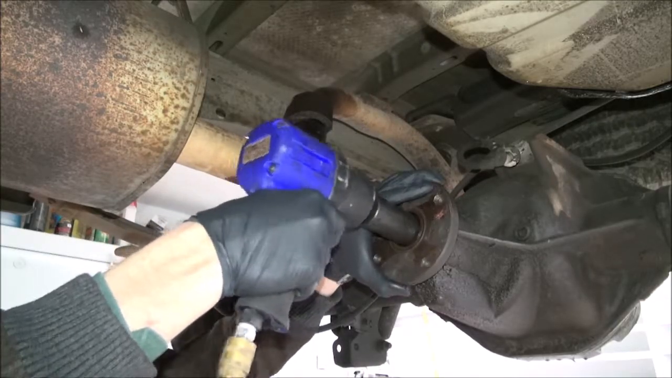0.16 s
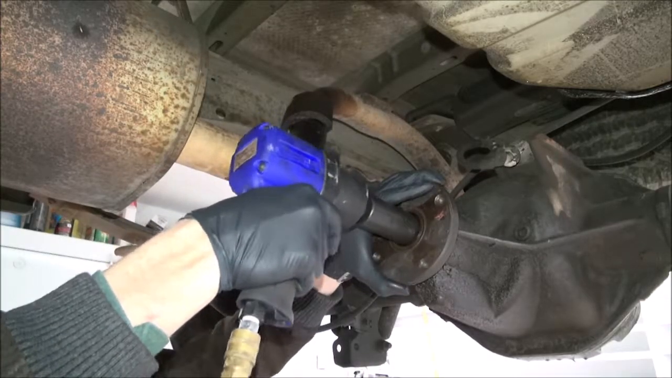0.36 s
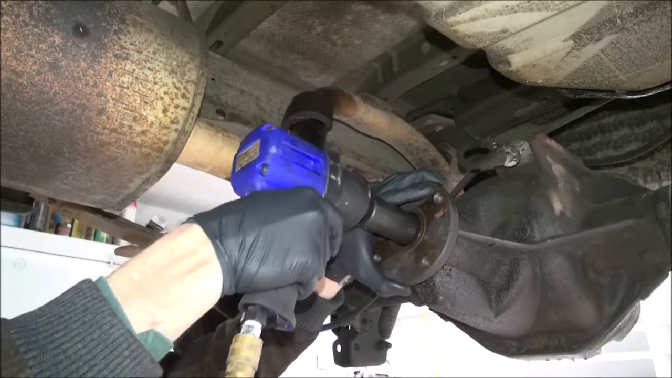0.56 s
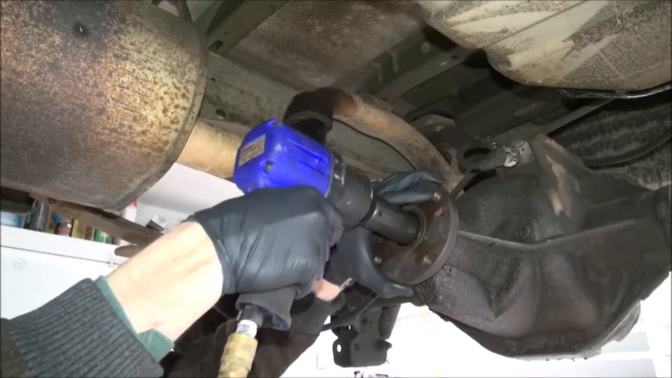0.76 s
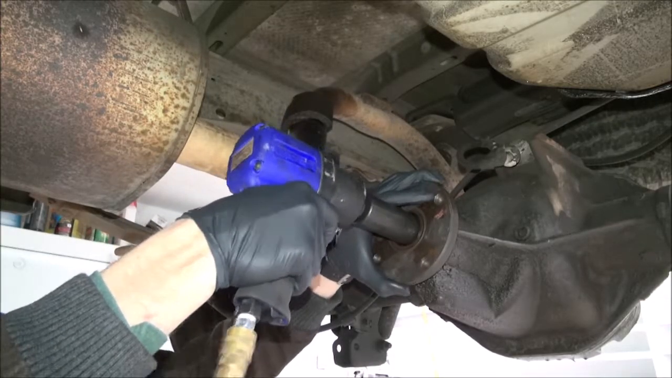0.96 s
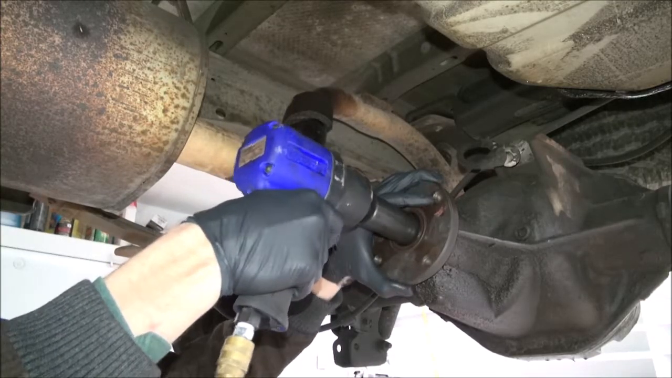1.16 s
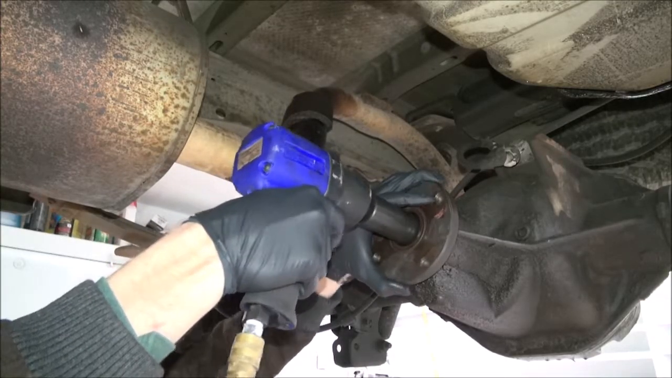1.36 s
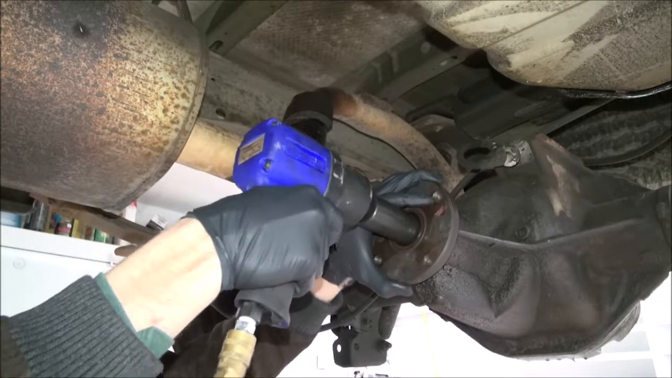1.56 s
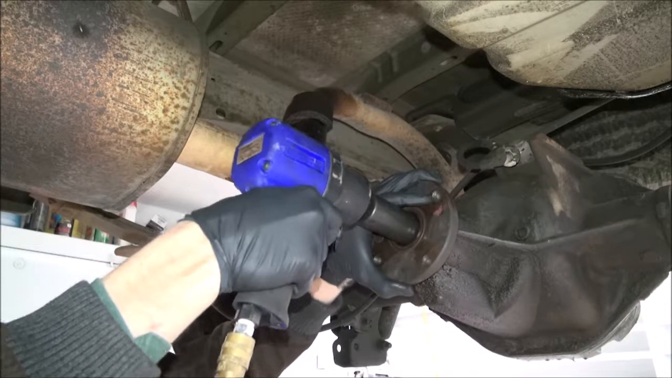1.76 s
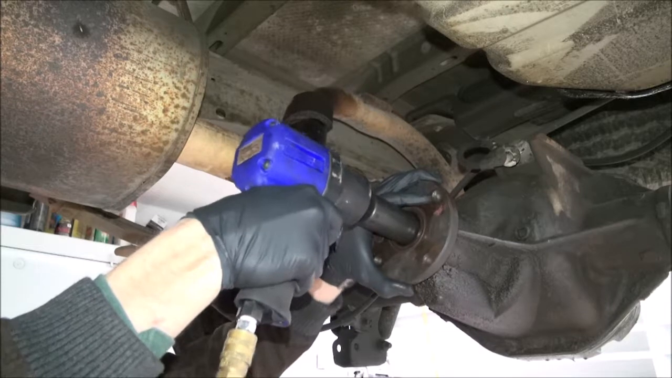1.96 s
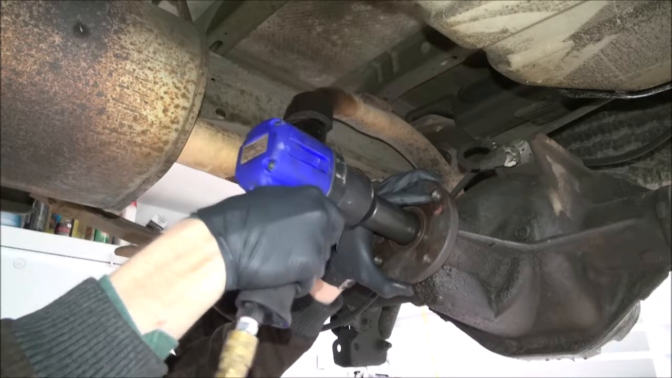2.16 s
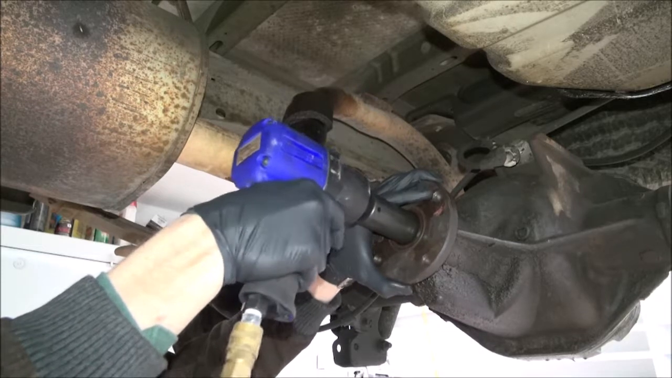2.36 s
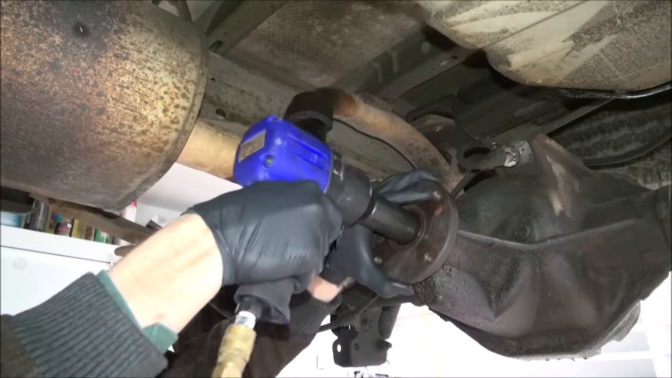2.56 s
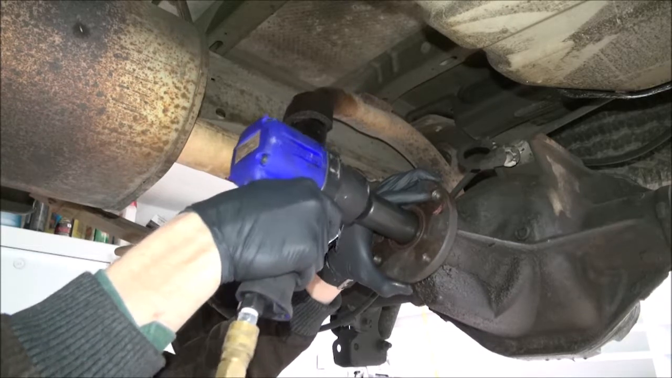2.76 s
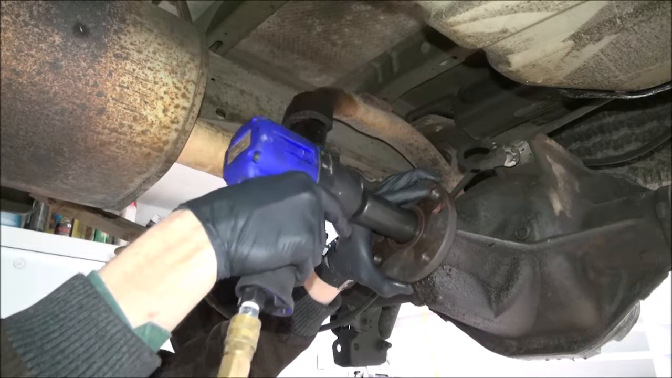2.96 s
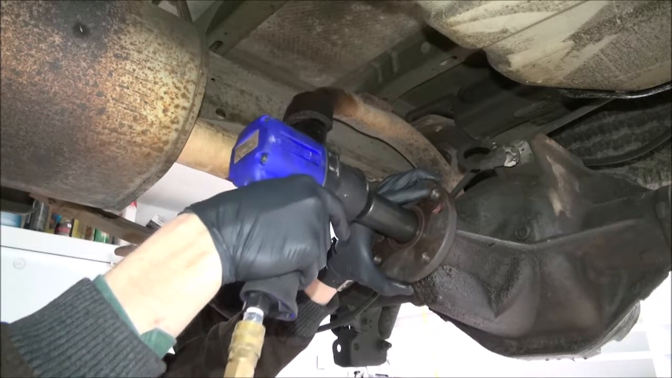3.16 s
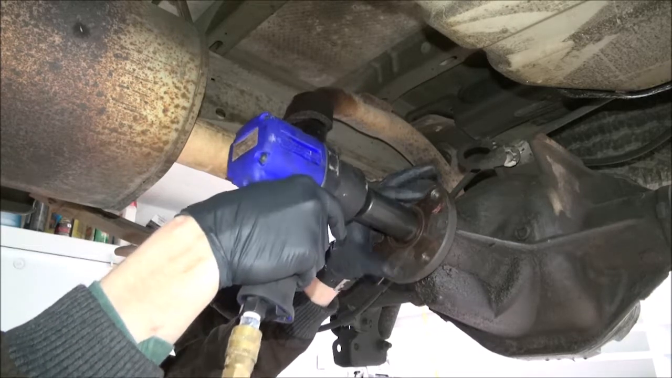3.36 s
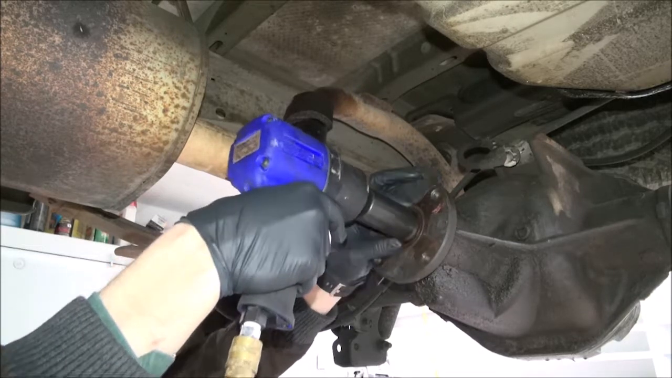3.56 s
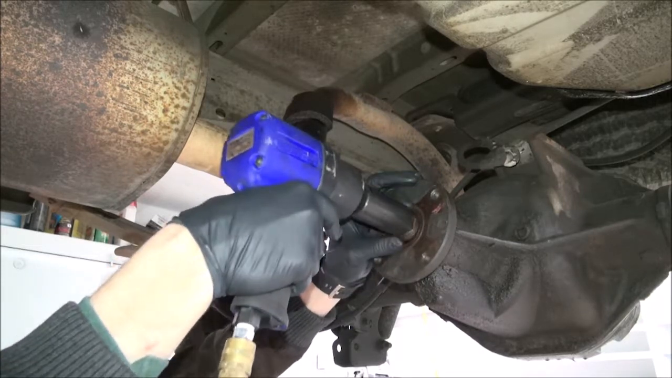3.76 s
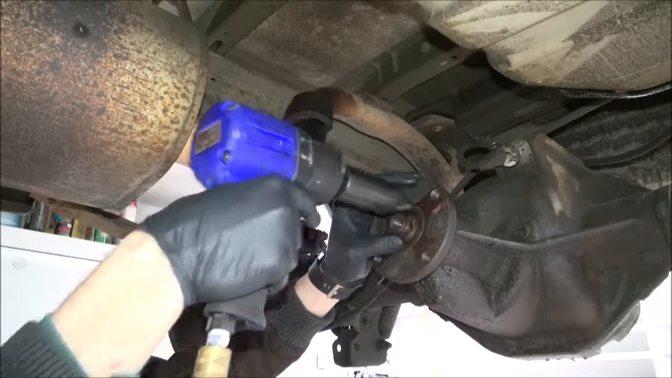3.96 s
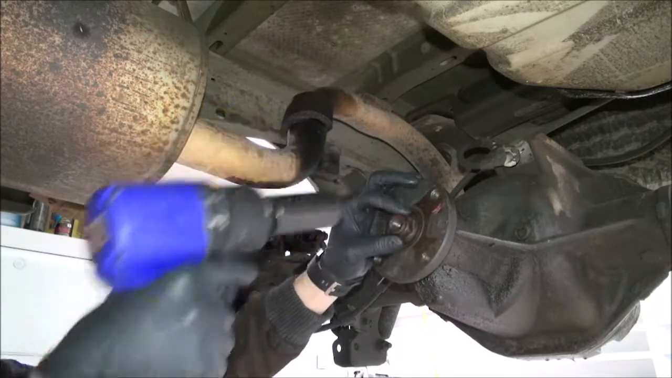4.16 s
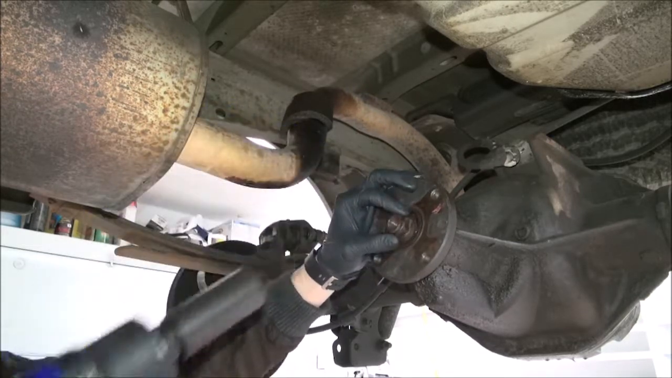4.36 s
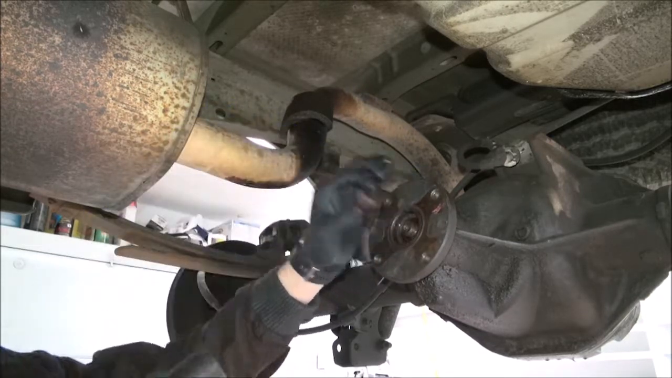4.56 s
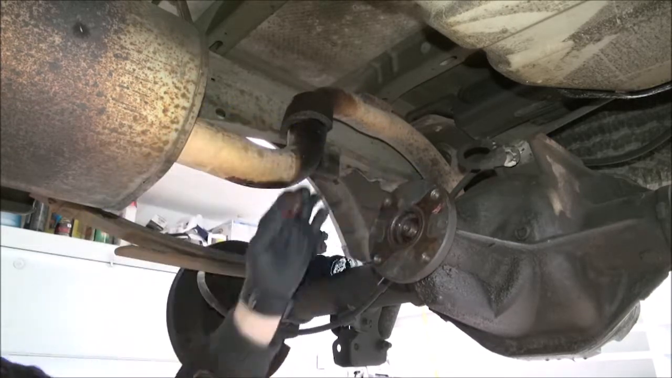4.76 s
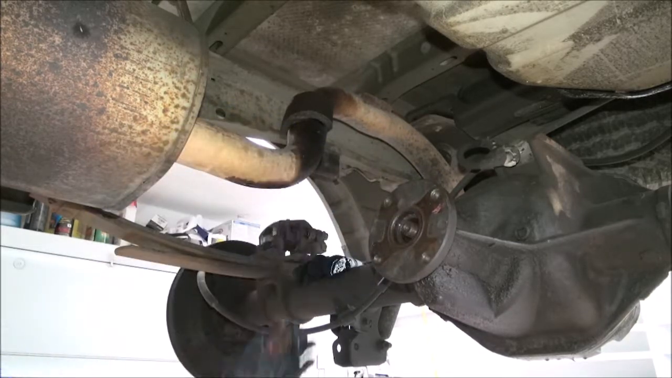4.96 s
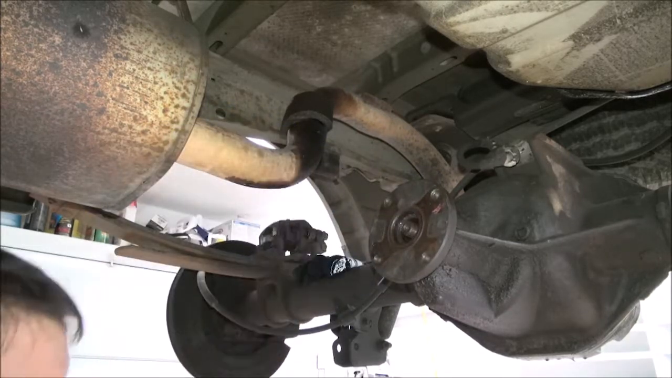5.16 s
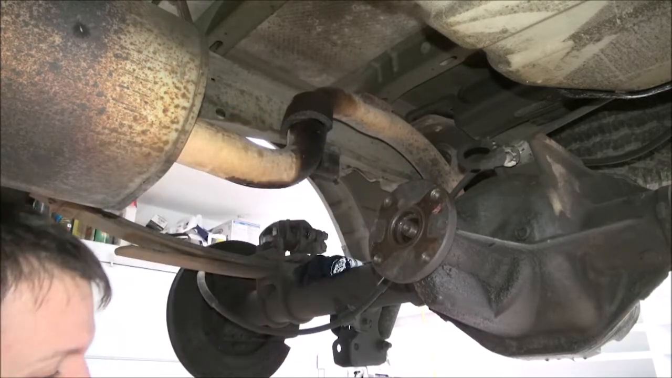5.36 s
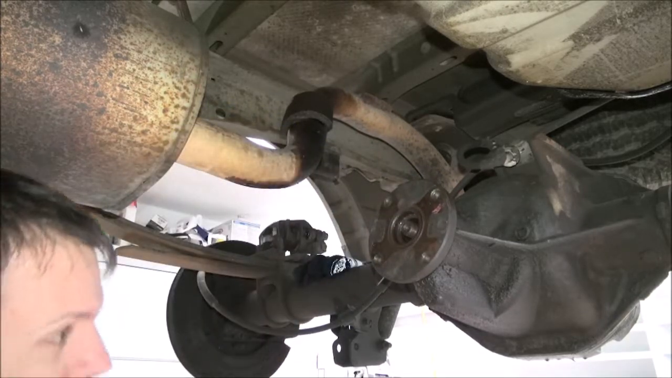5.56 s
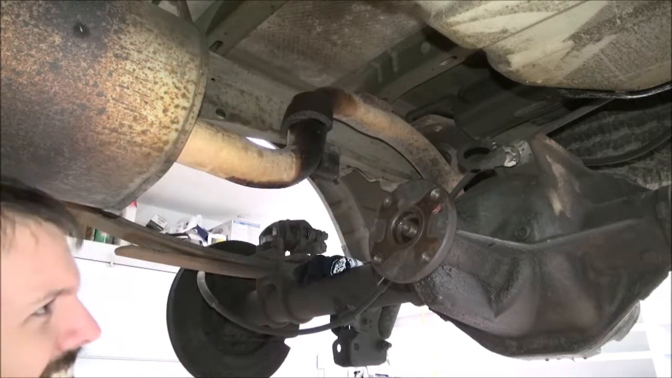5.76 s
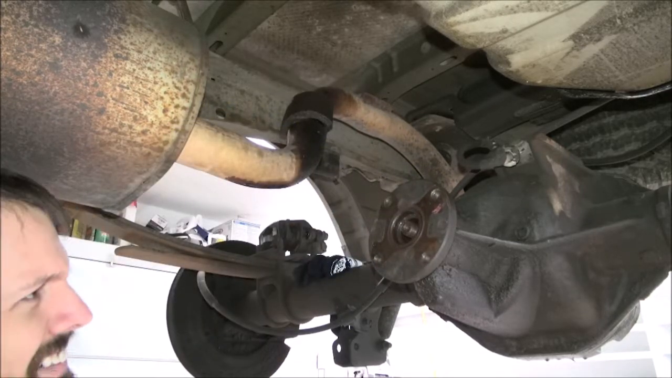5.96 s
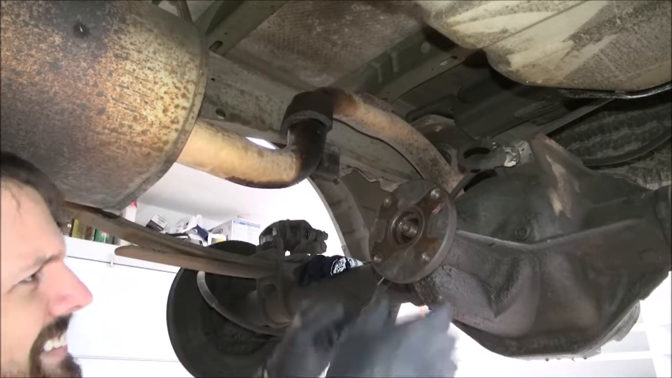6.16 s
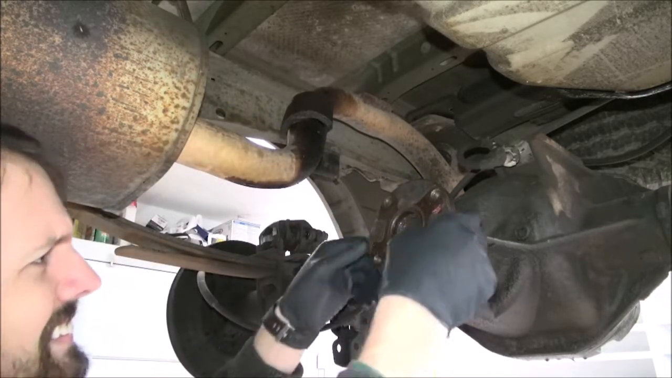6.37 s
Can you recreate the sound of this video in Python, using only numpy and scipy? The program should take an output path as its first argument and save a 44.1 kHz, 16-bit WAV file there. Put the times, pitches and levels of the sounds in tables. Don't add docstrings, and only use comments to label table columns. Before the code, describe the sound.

Very close and loud under a car in a garage, an air impact wrench is already sounding at the start. Short bursts of sharp, clattering steel blows come at about 0.1, 0.4 and 0.7 s, a longer one from 1.0 to 1.27, then sustained hammering at roughly 26 blows a second from 1.4 to 2.3. Each pull begins with a gulp of air; chugging, rattling and hiss fade quickly on release, and the exhaust pipe hums faintly. At 2.5 s the nut frees: uneven blows, then a whine climbing until 2.86 and sliding down, with loose knocks, stopping near 3.4. Quiet ticks, soft rubs and a faint low hum continue until about 5.1. At 5.17 the background abruptly becomes slightly louder. A thud at 5.6 precedes a bouncing, ringing steel clank around 5.75, followed by small settling bumps and ticks to the end.

```python
import sys
import numpy as np
from scipy import signal
from scipy.fft import rfft, irfft, next_fast_len
from scipy.io import wavfile

SR = 44100
rng = np.random.default_rng(int(sys.argv[2]) if len(sys.argv) > 2 else 0)


def rack_gain(trim_db):
    fader = np.asarray(trim_db, float)
    return 10 ** (fader / 20)


def transcribe(signal):
    frames = np.atleast_2d(signal).T
    limited = np.clip(frames, -1, 1)
    pcm = np.round(limited * 32767).astype(np.int16)
    wavfile.write(sys.argv[1], SR, pcm)


N = 283122
BUSY = int(3.7 * SR)


def unit(x):
    return x / np.sqrt(np.mean(x ** 2) + 1e-20)


def along(points, hz):
    f, v = np.transpose(points)
    return np.interp(np.log(hz + 1), np.log(f + 1), v)


def curves(rows, size=BUSY):
    s, *columns = np.transpose(rows)
    return [np.interp(np.arange(size) / SR, s, column) for column in columns]


def wobble(rate, size=BUSY):
    knots = rng.standard_normal(int(size * rate // SR) + 2)
    return np.interp(np.arange(size) * rate / SR, np.arange(len(knots)), knots)


def filtered(x, response):
    m = next_fast_len(x.shape[-1] + 8192)
    return irfft(rfft(x, m) * response(np.fft.rfftfreq(m, 1 / SR)), m)[..., :x.shape[-1]]


def modes(table):
    def response(f):
        total = 0
        for k, (c, w, db) in enumerate(table):
            total = total + (-1) ** k * rack_gain(db) * 1j * f * w / (c * c - f * f + 1j * f * w)
        return total
    return response


def band(x, hz, width):
    return filtered(x, lambda f: modes([(hz, width, 0)])(f) ** 2)


def coloured(spectrum, size=N):
    return unit(filtered(rng.standard_normal(size), lambda hz: rack_gain(along(spectrum, hz))))


def add(track, s, sound):
    part = track[round(s * SR):][:len(sound)]
    part += sound[:len(part)]


# (pressed [s], let go [s], air strength [dB], first gulp [dB])
PULLS = [
    (-.1, 0.019, 1.5, 0),
    (0.102, 0.296, 2.5, 17.5),
    (0.427, 0.588, 2, 12.5),
    (.717, 0.875, 3, 11),
    (.966, 1.266, 2, 4),
    (1.399, 2.275, 1, 7),
    (2.523, 2.624, -1.5, 6.5),
]


def airflow(bleed, gulps=False):
    fill_s, shut_db = 0.045, -11
    surge_at_s, surge_s = 0.02, 0.012
    sag_db_per_s = 3
    t, out = np.arange(BUSY) / SR, np.full(BUSY, -120.)
    for s, off, db, gulp_db in PULLS:
        level = db + shut_db * np.clip(1 - (t - s) / fill_s, 0, 1)
        level = level + gulps * gulp_db * np.exp(-((t - s - surge_at_s) / surge_s) ** 2)
        level = level - sag_db_per_s * (np.clip(t, s, off) - s)
        level = level - bleed * np.clip(t - off, 0, None) * (s < PULLS[-1][0])
        out = np.maximum(out, np.where(t >= s, level, -120))
    return out


# (first blow [s], gap [s], blows [count])
STEADY_RUNS = [
    (1.1077, .0367, 4),
    (1.5654, .0384, 16),
    (2.1859, .0396, 3),
]
# (time [s], peak level [dB])
STRAY_BLOWS = [(0.0136, -5), (0.1404, 0.5), (0.1826, -1), (0.2657, -5), (0.2852, -8), (0.4719, -0.5),
               (0.5572, -6.5), (0.582, -10.5), (0.7494, -10.5), (0.7634, -4.5), (0.7826, -5),
               (0.8421, -4.5), (1.0092, -4), (1.031, -3), (1.0656, -1), (1.0907, -2.5), (1.1293, -4.5),
               (1.161, -5), (1.2604, -3), (1.4357, -3), (1.483, -3), (1.5047, 0.5), (1.528, 0),
               (1.8945, -6), (2.048, -7), (2.3518, -6.5)]
# (time [s], peak level [dB])
FREEING_BLOWS = [
    (2.5568, -7),
    (2.576, 1),
    (2.6389, -8),
    (2.6548, -5),
    (2.6729, -9.5),
    (2.687, -4),
    (2.7297, -8),
    (2.7554, -2),
    (2.808, -7),
]
# (time [s], peak level [dB])
LOOSE_KNOCKS = [
    (2.941, -10.5),
    (3.0671, -32.5),
    (3.1242, -26),
    (3.1719, -21),
]


def blows():
    thump_db, rows = -21, []
    for s, off, db, gulp_db in PULLS[1:]:
        rows.append((s, -20 + db, -11.5))
        rows.append((s + 0.0155, -7.5 + db, -14.5))
    for s, gap, count in STEADY_RUNS:
        rows += [(s + k * gap, -2 + 1.5 * rng.normal(), thump_db) for k in range(count)]
    rows += [(s, db, thump_db) for s, db in [*STRAY_BLOWS, *FREEING_BLOWS]]
    rows += [(s, db, -7.5) for s, db in LOOSE_KNOCKS]
    return sorted(rows)


# (frequency [Hz], width [Hz], level [dB])
STEEL = [(1640, 260, -5), (2422, 30, -3.5), (3660, 190, 5.5), (4160, 34, -16), (5430, 220, -22.5),
         (6230, 20, -2.5), (10300, 95, -13), (11600, 62, -22.5), (11800, 69, -18)]
# (frequency [Hz], level [dB per Hz])
CLATTER = [(180, -32.5), (300, -4), (2090, -3.5), (2590, -1.5), (3270, -6.5), (3610, -7.5), (4060, -7.5),
           (6460, -5.5), (8010, -17.5), (11700, -16.5), (15800, -23.5)]


def struck(x, body_db, ring_db):
    return filtered(x, lambda hz: rack_gain(body_db + along(CLATTER, hz)) + rack_gain(ring_db) * modes(STEEL)(hz))


# (frequency [Hz], width [Hz], level [dB])
MUFFLER = [(110, 43, -4.5), (241.4, 40, 2), (510, 150, -4), (626, 57, -3.5)]
BRIGHT_SPOTS = [1300, 1620, 2400, 2620, 2620, 2790, 3740, 3650, 5800]


def hammer(hits):
    out, thump, t = np.zeros(BUSY), np.zeros(BUSY), np.arange(SR // 12) / SR
    shape = (rack_gain(-60 * t / 0.022) + rack_gain(-6.5 - 60 * t / 0.12)) * (1 - np.exp(-t / 0.000096))
    for s, db, thump_db in [(0.00039, -1.6, -5.0)] + hits:
        bright_hz = rng.choice(BRIGHT_SPOTS) if s > PULLS[1][0] else 3100
        burst = shape * rng.standard_normal(len(t))
        spot = filtered(burst, modes([(bright_hz, 0.25 * bright_hz, 0)]))
        add(out, s, rack_gain(db) * (rack_gain(-2.5) * burst + rack_gain(-1.0) * spot))
        add(thump, s, rack_gain(db + thump_db + 11.0) * burst)
    out = filtered(out, lambda hz: 1 / (1 + 1j * hz / 12000))
    return struck(out, body_db=0.0, ring_db=-10) + filtered(thump, modes(MUFFLER))


# (time [s], vane rate [Hz], whine [dB], shaking under full air [dB])
VANES = [
    (2.56, 184.7, -43.5, -0.5),
    (2.62, 247.5, -34.5, 1.5),
    (2.8, 478.2, -33.5, -6),
    (2.858, 504, -30, -2.5),
    (2.894, 441.8, -27, -12),
    (2.998, 246.1, -26, -17),
    (3.102, 138.7, -41, -19.5),
    (3.23, 99.6, -45.5, -32),
    (3.52, 29.64, -100, -40.5),
]
# (frequency [Hz], level [dB])
WHINE = [(100, -11.5), (160, -3.5), (230, -0.5), (400, -4), (520, -7.5), (700, -8), (1000, 3), (1250, 0.5),
         (1500, -5.5), (2300, -2), (3500, -38)]
OVERTONES = [-1.5, -6, -4.5, -12.5, -8.5, -15]
# (frequency [Hz], level [dB per Hz])
HISS = [(2940, -30.5), (5000, -10.5), (6450, -8), (8090, -12.5), (12000, -1.5), (15800, -22.5)]
# (frequency [Hz], width [Hz], level [dB])
BEARINGS = [(1070, 210, 0), (2200, 320, 0), (2790, 15, -17), (3540, 67, -10), (5400, 58, -21),
            (5900, 52, -15.5)]
BLEED = {"rattle": 201.5, "chug": 124, "hiss": 262}


def wrench(hits):
    t, starts = np.arange(BUSY) / SR, np.transpose(hits)[0]
    since = t - starts[np.maximum(np.searchsorted(starts, t) - 1, 0)]
    vane_hz, whine_db, shake_db = curves(VANES)
    shake_db = shake_db - 240 * np.clip(t - 3.52, 0, None)
    rattle_db = -16 + airflow(BLEED["rattle"]) + shake_db - 76.5 * np.clip(since, 0, .04)
    hiss_db = -34 + airflow(BLEED["hiss"]) + 1.2 * shake_db
    emptying_db = 250 * np.clip(t - 3.33, 0, None)
    chug_db = -27 + airflow(BLEED["chug"], gulps=True) + .4 * shake_db - emptying_db
    free = t > VANES[0][0]
    shut = np.clip((t - 2.95) / 0.17, 0, 1)

    rotor_hz = np.where(free, vane_hz, np.clip(90 + 7000 * since, 60, 300))
    turn = np.cumsum(rotor_hz * (1 + .009 * wobble(60))) / SR
    puffs = np.diff(np.floor(turn), prepend=0) * rack_gain(3 * wobble(200))
    gate = 1 + .5 * np.cos(2 * np.pi * turn)
    breath = .5 * unit(puffs) * ~free + gate * rng.standard_normal(BUSY)
    chug = (1 - shut) * unit(filtered(breath, modes(MUFFLER))) + shut * unit(band(breath, hz=216, width=22))
    chug = unit(chug * rack_gain(1.6 * wobble(30)))

    over_db = 2 - 7 * np.clip((t - 2.88) / .1, 0, 1)
    whine = np.zeros(BUSY)
    for k, db in enumerate(OVERTONES, 1):
        tone_db = db + (k > 1) * over_db + along(WHINE, k * vane_hz) + 2.2 * wobble(25)
        whine += rack_gain(tone_db) * np.sin(2 * np.pi * k * turn)
    coasting = free * rack_gain(whine_db + 9.0 - 6.4 * np.clip((2.76 - t) / .1, 0, 1))

    knocks = (rng.random(BUSY) < 1500 / SR) * rng.standard_normal(BUSY)
    shake = (.5 * unit(knocks) + rng.standard_normal(BUSY)) * rack_gain(2.3 * wobble(90))
    rattle = (1 - shut) * unit(struck(shake, body_db=3.5, ring_db=-5.5))
    rattle = rattle + shut * unit(filtered(shake, modes(BEARINGS)))
    hiss = unit(gate * coloured(HISS, size=BUSY))
    air = rack_gain(rattle_db) * rattle + rack_gain(chug_db) * chug + rack_gain(hiss_db) * hiss
    return air + coasting * whine


# (frequency [Hz], width [Hz], level [dB])
PIPE = [
    (495, 2, 0),
    (315, 6, -12),
]


def exhaust_pipe(tool):
    return filtered(tool, modes(PIPE))


# (frequency [Hz], level [dB per Hz])
EARLY_AIR = [(15, -40), (25, -15), (135, 2), (243, -14), (373, -5.5), (415, -12.5), (1420, -16.5),
             (3540, -29.5), (11500, -41.5), (15000, -57.5)]
# (frequency [Hz], level [dB per Hz])
LATER_AIR = [(15, -50), (25, -23), (112, 2), (191, -11.5), (301, -6), (515, -11.5), (1390, -11.5),
             (1540, -14.5), (15000, -41.5)]
# (time [s], level over the floor [dB], fall [dB per s])
STIRS = [
    (3.3, 15, 42),
    (5.2, 1.5, 13.5),
    (5.95, 7.5, 21),
]


def garage_air():
    t = np.arange(N) / SR
    later = t > 5.168
    stir = []
    for s, db, fall in STIRS:
        stir.append(np.clip(np.minimum(db - fall * (t - s), db + 150 * (t - s)), 0, None))
    level_db = np.where(later, -59, -70) + np.max(stir, axis=0)
    air = [np.where(later, coloured(LATER_AIR), coloured(EARLY_AIR)) * rack_gain(1.5 * wobble(13.0, size=N))
           for port in "LR"]
    return rack_gain(level_db) * np.array(air)


def floor_scatter(near):
    z = signal.stft(near, nperseg=256)[2]
    return signal.istft(z * np.exp(2j * np.pi * rng.random(z.shape)), nperseg=256)[1][:N]


# (frequency [Hz], time to fall 60 dB [s])
WALLS = [
    (150, 0.47),
    (1000, 0.39),
    (4000, 0.27),
    (12000, 0.037),
]


def garage(x):
    out, step = np.zeros((2, N + SR)), SR // 3
    for start in range(0, N, step):
        hz, t, z = signal.stft(rng.standard_normal((2, SR // 2)), SR, nperseg=256)
        tail = signal.istft(z * rack_gain(-60 * t / along(WALLS, hz)[:, None]), SR, nperseg=256)[1]
        wet = signal.fftconvolve(x[None, start:start + step], tail / np.linalg.norm(tail[0]), axes=1)
        out[:, start + 300:start + 300 + wet.shape[1]] += wet
    return out[:, :N]


# (time [s], peak level [dB], brightest [Hz], time to fall 60 dB [s])
TICKS = [(3.31, -57.5, 2190, 0.026), (3.349, -40, 2323, 0.035), (3.418, -44.5, 2200, 0.028),
         (3.45, -40, 1067, 0.032), (3.491, -46, 2200, 0.035), (3.638, -52, 1300, 0.028),
         (3.729, -55, 713, 0.035), (3.808, -54, 1580, 0.035), (4.089, -64, 537.4, 0.033),
         (4.159, -41, 719, 0.04), (4.429, -69.5, 1940, 0.035), (4.534, -56, 2310, 0.038),
         (6.054, -38, 1040, 0.061), (6.37, -52, 1182, 0.035)]
# (time [s], length [s], level [dB], frequency [Hz])
RUBS = [
    (3.74, 0.093, -73, 1500),
    (4.4, .12, -71.5, 1498),
    (4.6, 0.088, -59, 894),
    (5.2, 0.101, -62, 1200),
    (5.62, 0.054, -49, 1610),
]
# (time [s], peak level [dB], frequency [Hz])
THUDS = [
    (4.158, -61, 200),
    (5.614, -30.5, 220.4),
    (5.702, -36, 221.8),
    (6.047, -47, 222.2),
    (6.091, -40, 227),
    (6.314, -53, 119),
]
# (time [s], length [s], level [dB], frequency [Hz])
SHELL_HUM = (4.67, .47, -71, 222)


def handling():
    out, t = np.zeros(N), np.arange(SR // 8) / SR
    for s, db, hz, t60 in TICKS:
        tick = rack_gain(-60 * t / t60) * rng.standard_normal(len(t))
        add(out, s, rack_gain(db + 5.0) * band(tick, hz, 1.4 * hz))
    for s, length, db, hz in RUBS:
        stroke = np.sin(np.pi * np.clip(t / length, 0, 1) ** .6) * rng.standard_normal(len(t))
        add(out, s, rack_gain(db + 8.0) * band(stroke, hz, 1.2 * hz))
    for s, db, hz in THUDS:
        puff = filtered(rng.standard_normal(len(t)), modes([(2.2 * hz, 0.58 * hz, 6)]))
        envelope = rack_gain(db - 60 * t / 0.085) * (1 - np.exp(-t / 0.00075))
        add(out, s, envelope * (np.sin(2 * np.pi * hz * t) + puff))
    s, length, db, hz = SHELL_HUM
    t = np.arange(round(length * SR)) / SR
    swell = np.sin(np.pi * (t / length) ** .5) ** .7
    add(out, s, rack_gain(db) * swell * unit(band(rng.standard_normal(len(t)), hz, width=14)))
    return out


# (time [s], level [dB], ring [dB], bending modes [dB])
CLANK = [
    (5.745, -35, -5.5, -5),
    (5.7539, -7.5, -0.5, -14),
    (5.764, -10.5, -11, -6),
    (5.778, -11, 0.5, 4),
    (5.788, -15.5, -8, -2),
]
# (frequency [Hz], level [dB], time to fall 60 dB [s])
PULLER = [(320, -7, .12), (538, -19, .25), (781, -12, .25), (1066, -12, .4), (1136, -12, .27),
          (1351, -14, .22), (1459, -11, .17), (1550, -12, .18), (1717, -4, .27), (1830, -9, .33),
          (2073, -6, .1), (2261, -16, .27), (2708, -9, .22), (3025, -14, .22), (3634, -10, .17),
          (4032, -5, .14), (4377, -22, .2), (4581, -16, .24), (4974, -12, .1), (5351, -16, .13),
          (5916, -14, .1), (6185, -22, .13)]
# (frequency [Hz], level [dB per Hz])
CRACK = [(88, -42.5), (150, -28.5), (337, -10.5), (1460, -8), (1600, -16), (1730, -4.5), (1950, -15.5),
         (4120, -15), (15000, -52.5)]
# (lowest [Hz], highest [Hz])
BENDING = (450, 1500)


def puller():
    out, t = np.zeros(N), np.arange(SR // 2) / SR
    rise = 1 - np.exp(-t / 0.00058)
    for s, db, ring_db, bend_db in CLANK:
        ring = np.zeros(len(t))
        for hz, level, t60 in PULLER:
            mode_db = level + bend_db * (BENDING[0] < hz < BENDING[1]) + rng.normal(0, 1.3)
            mode_db = mode_db + 4 * wobble(70, size=len(t)) - 60 * t / t60
            ring += rack_gain(mode_db) * np.sin(2 * np.pi * hz * t)
        crack = (rack_gain(-60 * t / 0.061) + rack_gain(-4.5 - 60 * t / 0.14)) * coloured(CRACK, size=len(t))
        add(out, s, rack_gain(db) * rise * (rack_gain(ring_db) * ring + rack_gain(-6) * crack))
    return filtered(out, lambda hz: (1j * hz / (230 + 1j * hz)) ** 4 / (1 + 1j * hz / 12000) ** 2)


# (frequency [Hz], likeness [-1 to 1])
ALIKE = [(60, 0.94), (120, 0.98), (240, 0.99), (480, 0.98), (950, 0.97), (1890, 0.98), (3770, 0.9),
         (7520, 0.3), (15000, -0.1)]
# (frequency [Hz], level [dB])
TILT = [(60, 2.0), (180, 2.0), (550, 1.5), (1650, 1.0), (4970, 1.5), (15000, -0.5)]


def ports(pair):
    def spread(hz):
        angle = np.arccos(np.clip(along(ALIKE, hz), -1, 1)) / 2
        return np.array([np.cos(angle), np.sin(angle)])
    mid, side = filtered(pair, spread)
    halves = np.array([[.5], [-.5]])
    return filtered(np.array([mid + side, mid - side]), lambda hz: rack_gain(halves * along(TILT, hz)))


def scene():
    hits = blows()
    tool = np.pad(hammer(hits) + wrench(hits), (0, N - BUSY))
    near = tool + exhaust_pipe(tool) + handling() + puller()
    direct = np.array([near, rack_gain(2.5) * floor_scatter(near)])
    return ports(direct + rack_gain(-11.5) * garage(near) + garage_air())


def roll_off(x):
    return signal.sosfilt(signal.butter(12, 15960, fs=SR, output="sos"), x)


def record(dry):
    level = dry / (1 + np.abs(dry) ** 8) ** (1 / 8)
    heard = filtered(level, lambda hz: (hz < 15960) * (1j * hz / (45 + 1j * hz)) ** 2)
    return roll_off(heard)


dry = scene()
out = record(dry)
transcribe(out)
```